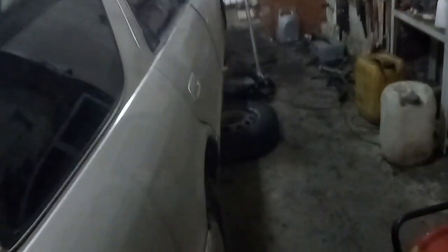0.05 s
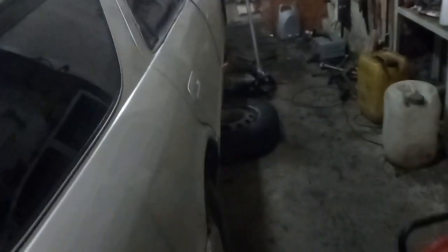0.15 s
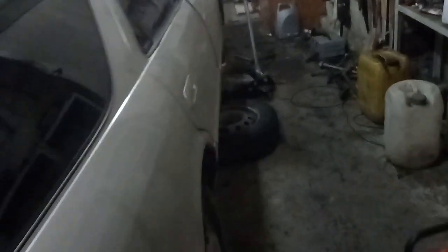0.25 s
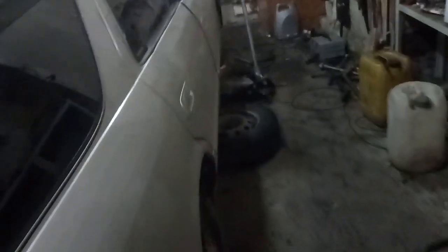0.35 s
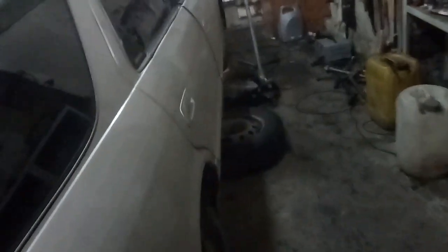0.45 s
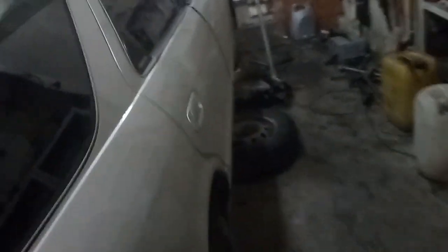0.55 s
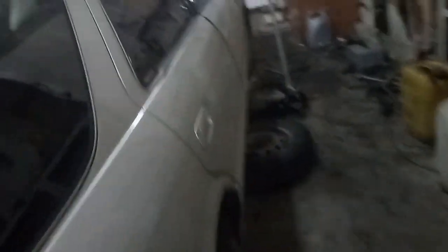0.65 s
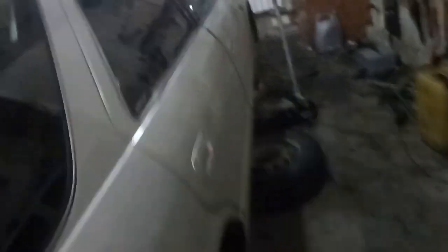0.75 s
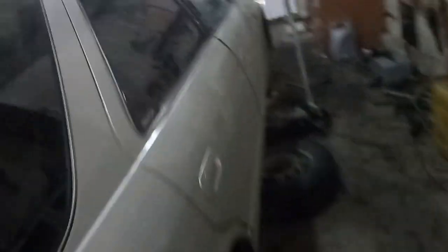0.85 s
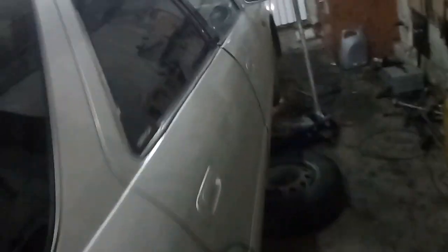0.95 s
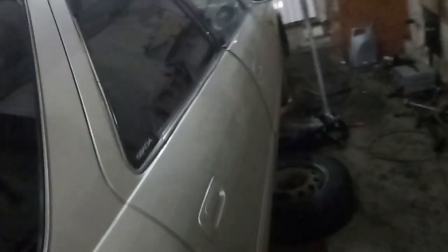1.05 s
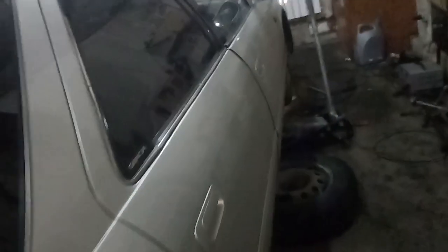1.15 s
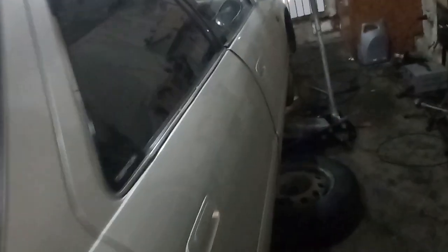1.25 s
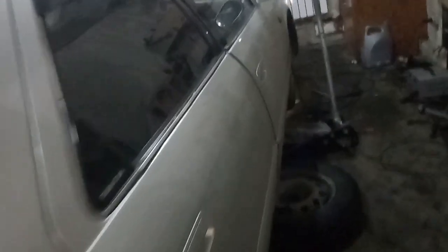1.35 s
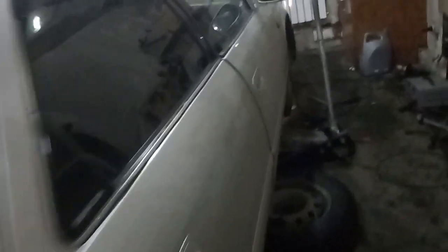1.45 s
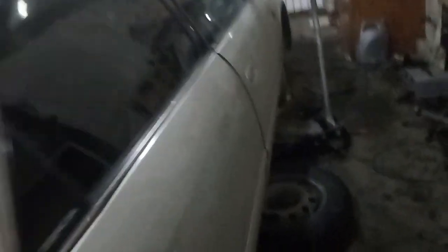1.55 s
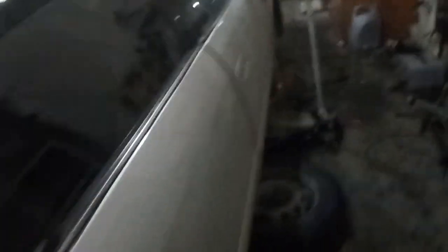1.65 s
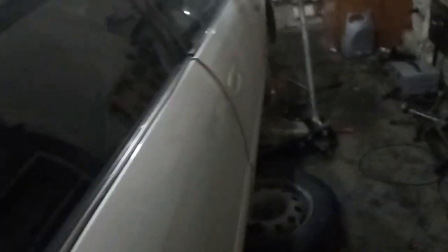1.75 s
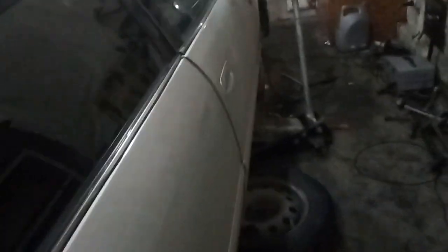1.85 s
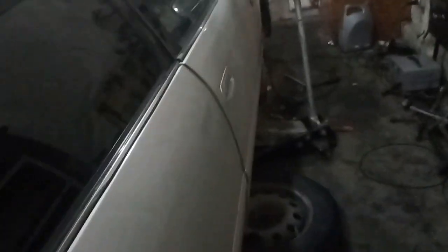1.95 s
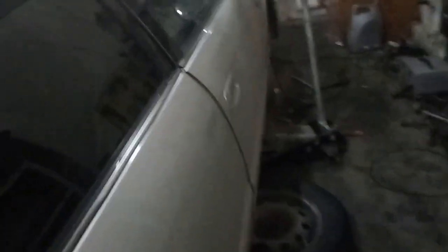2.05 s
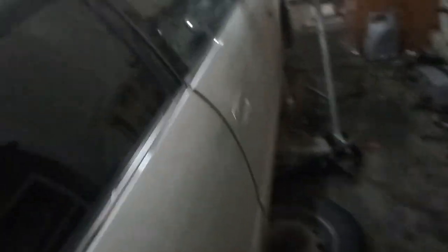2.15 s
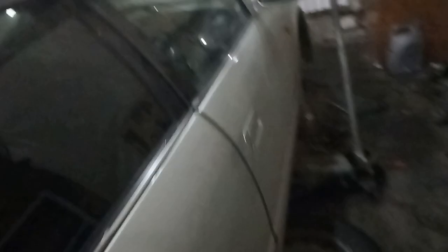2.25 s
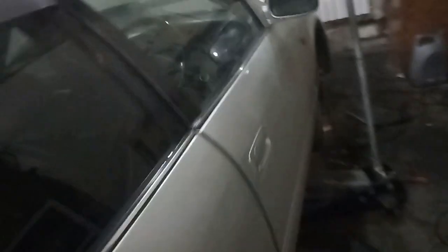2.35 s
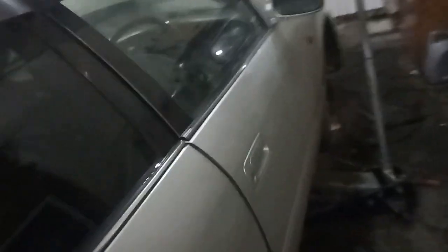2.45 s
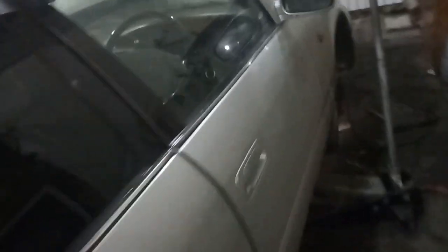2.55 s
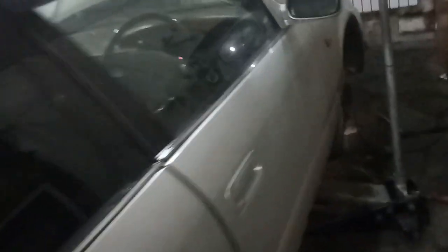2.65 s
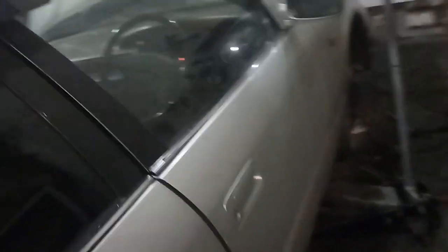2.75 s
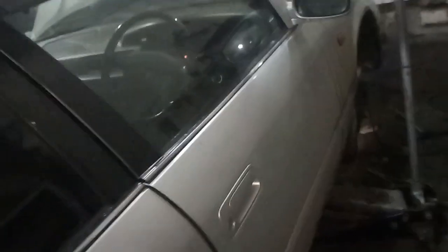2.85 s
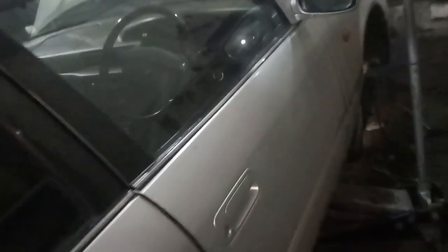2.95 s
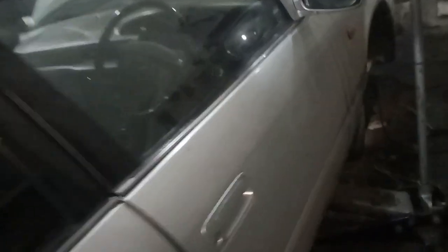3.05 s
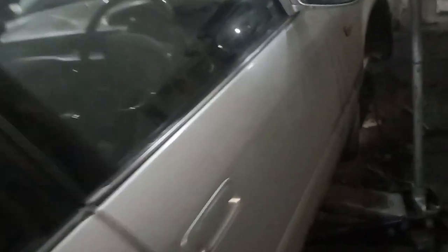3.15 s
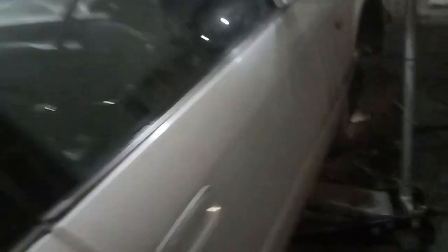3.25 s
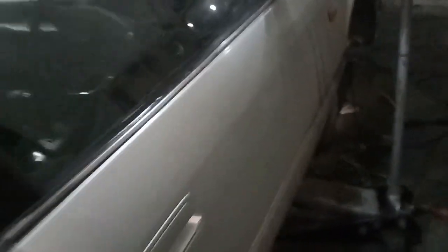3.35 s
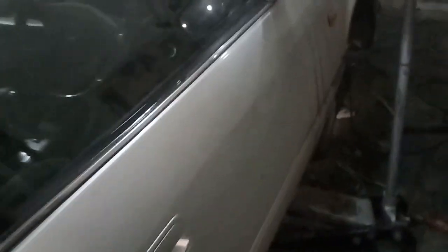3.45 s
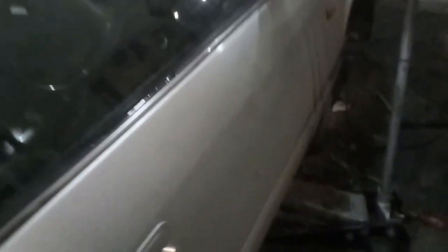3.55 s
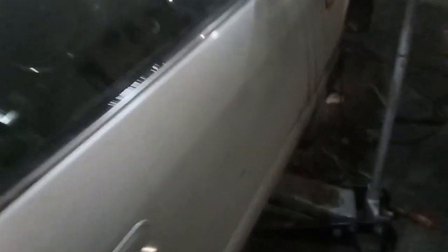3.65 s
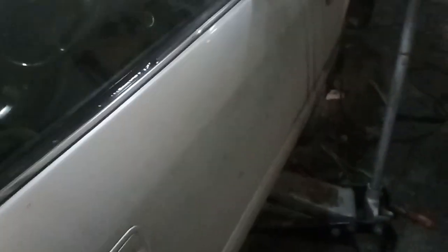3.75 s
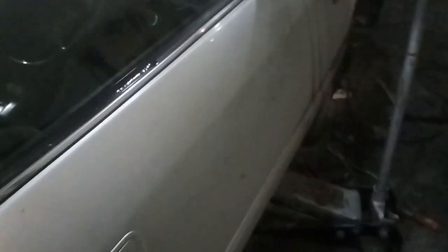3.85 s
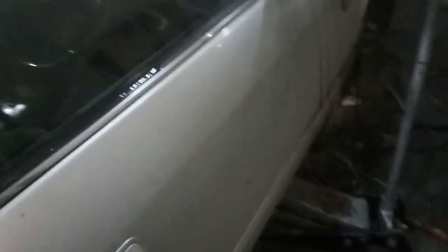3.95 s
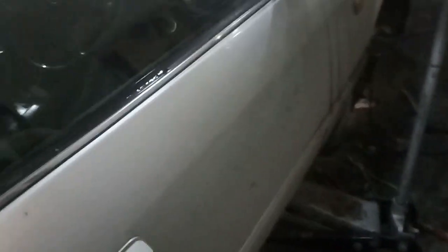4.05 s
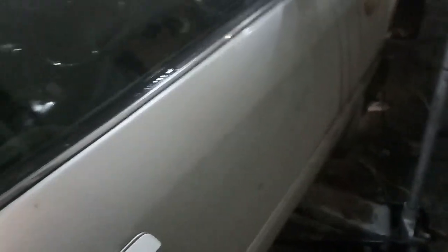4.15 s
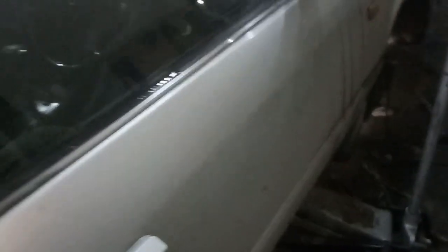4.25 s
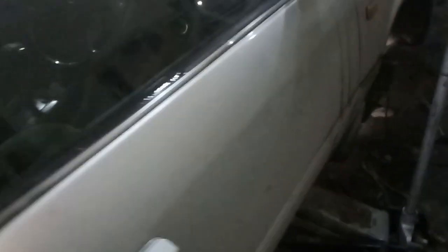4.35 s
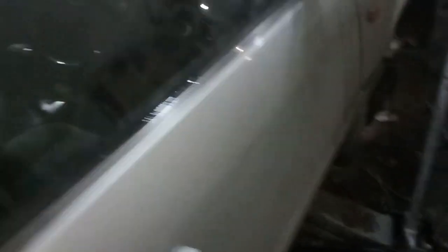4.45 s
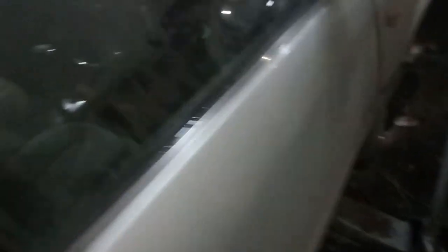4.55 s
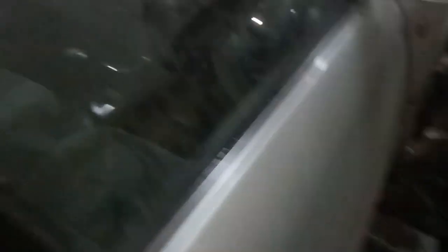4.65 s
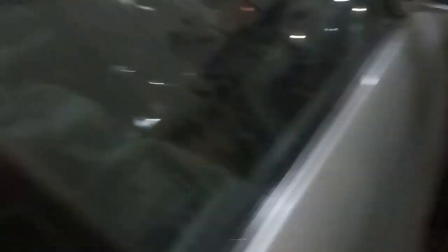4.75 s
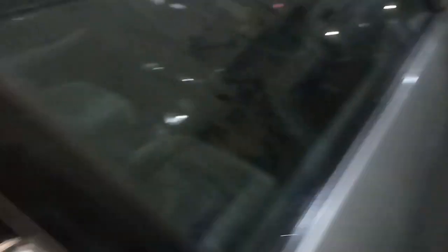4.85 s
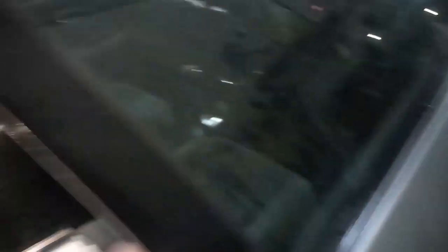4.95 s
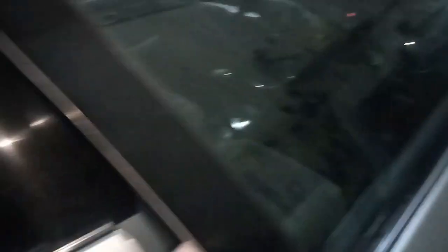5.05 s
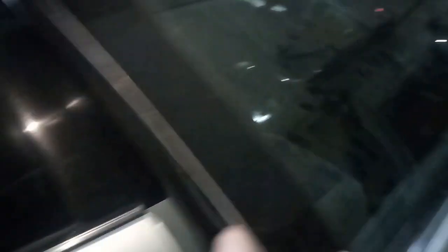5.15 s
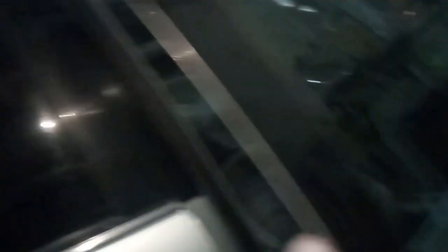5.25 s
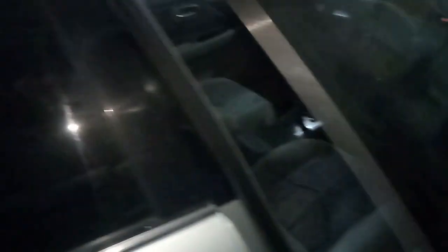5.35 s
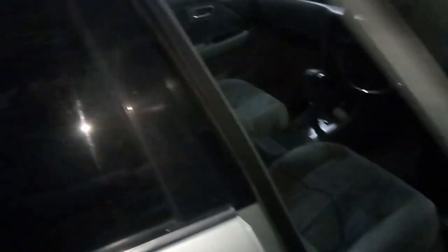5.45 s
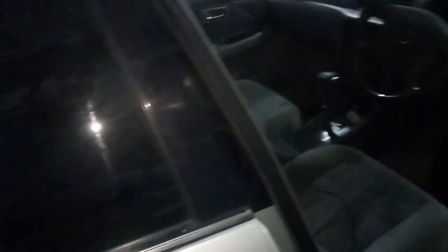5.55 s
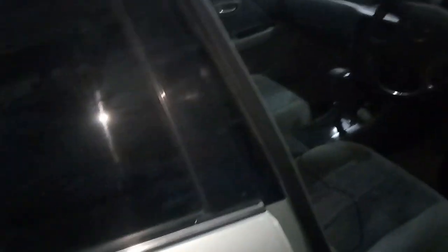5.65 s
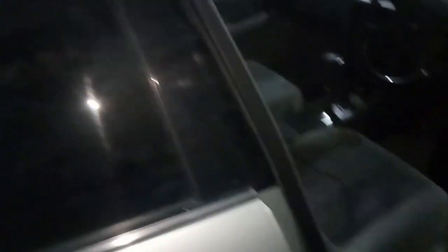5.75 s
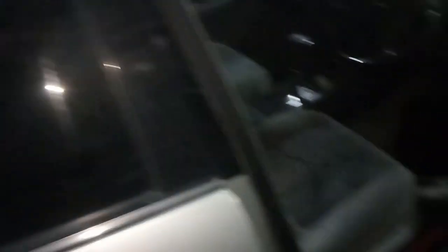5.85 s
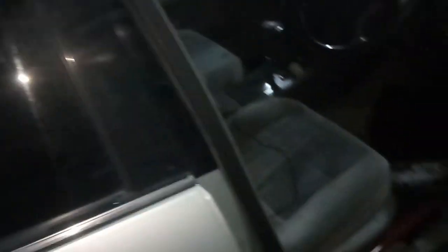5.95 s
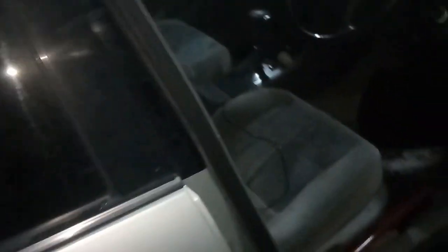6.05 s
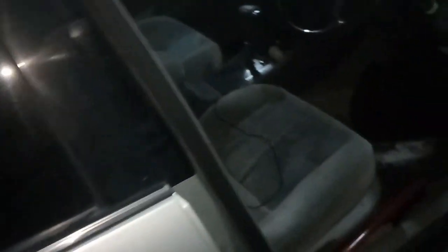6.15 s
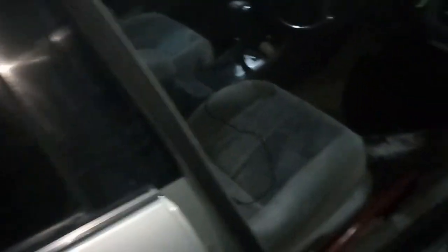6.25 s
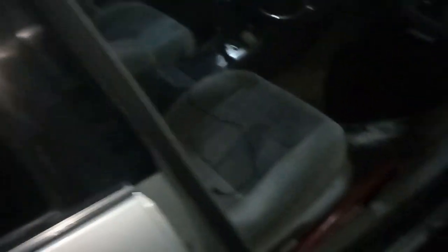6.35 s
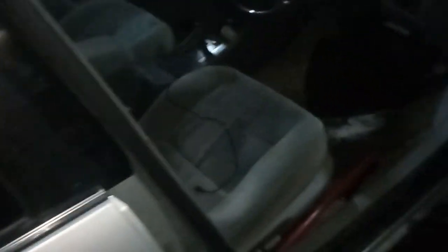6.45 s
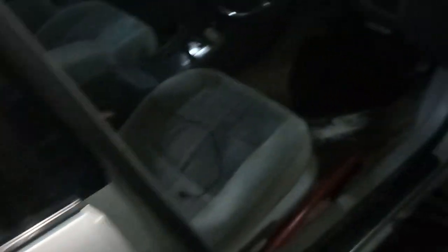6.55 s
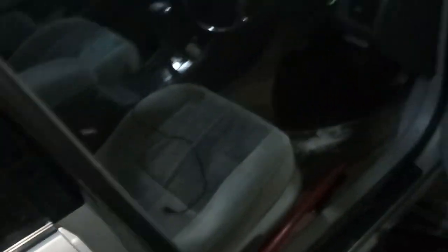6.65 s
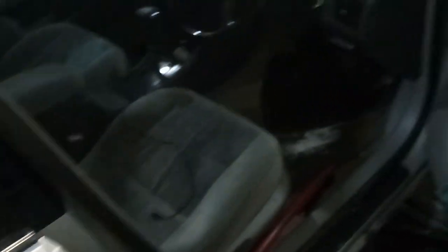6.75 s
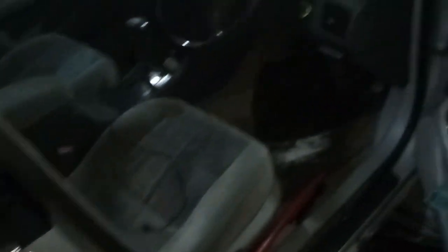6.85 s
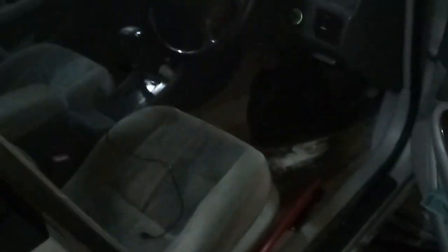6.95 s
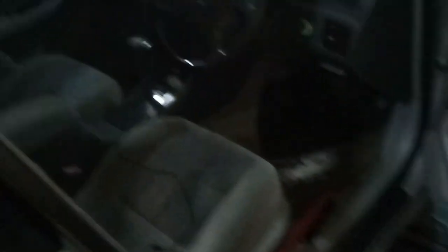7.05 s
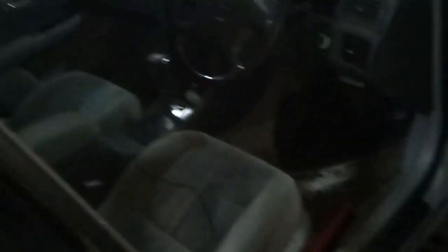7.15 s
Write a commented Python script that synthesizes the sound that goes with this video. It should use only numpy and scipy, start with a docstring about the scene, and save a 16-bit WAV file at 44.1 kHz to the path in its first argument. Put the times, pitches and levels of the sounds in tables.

```python
"""A jacket swishes as its wearer walks along a car in a small garage, holding two microphones close.
Soft footsteps pass, a hand knocks on the door handle, the latch lets go and the door pops off its seal;
then the handle ticks back and the sleeve sweeps past as the door swings open.
Cloth, air and handling are shaped noise; door and shoes are struck banks of decaying modes; cloth creases,
grit, zip and latch parts are short noise bursts; sparse random reflections give the garage."""
import sys
import numpy as np
from scipy import signal
from scipy.io import wavfile
from scipy.ndimage import uniform_filter1d

SR = 44100
rng = np.random.default_rng(int(sys.argv[2]) if len(sys.argv) > 2 else 0)


def to_wav(s):
    """Save 16-bit WAV."""
    ch = np.atleast_2d(s).T  # columns
    pcm = np.round(np.clip(ch, -1, 1) * 32767)  # PCM
    wavfile.write(sys.argv[1], SR, pcm.astype(np.int16))


N = 317961  # samples, 7.21 s

# Likeness of the noise at the two microphones. Each row: frequency in Hz, left-right correlation from 0 to 1.
LIKENESS = [(60, 0), (290, 0.81), (640, 0.59), (1400, 0.00013), (3000, 0), (15000, 0.26)]
# Spectrum of the still garage air. Each row: frequency in Hz, relative level in dB.
AIR_SPECTRUM = [(18, -37.5), (30, 11), (200, 2), (1830, -21), (2130, -5.5), (4200, -13), (6040, -2.5),
                (8040, -44.5), (11300, -30), (15000, -13.5)]
# Spectrum of handling rumble. Each row: frequency in Hz, relative level in dB.
RUMBLE_SPECTRUM = [(20, -16.5), (52, -22), (90, 2.5), (130, 6), (220, -4.5), (450, -18), (1500, -70.5)]
# Shifts of the hand's grip. Each row: start of the hold in seconds, hold in seconds, relative level in dB.
GRIP_SHIFTS = [(.68, 0.044, -62), (3.346, 0.24, -65), (4.165, .07, -48.5), (4.638, 0.18, -52),
               (5.11, 0.21, -61.5), (5.795, .06, -55), (6.297, .1, -61)]
GRIP_RISE_S, GRIP_FALL_S = 0.44, 0.25  # times for 20 dB
# Decay of the room's reflections. Each row: frequency in Hz, time to fall by 60 dB in seconds.
GARAGE_DECAY = [(100, 0.75), (300, 0.33), (1000, 0.63), (4000, 0.25), (12000, 0.52)]
# Cloth and fingers rubbing on the microphones' casing.
# Each row: start in seconds, length in seconds, centre frequency in Hz, rms level in dB.
CASING_RUBS = [(0.243, 0.24, 306, -63.5), (0.685, 0.064, 332, -54), (2.059, 0.079, 560, -64),
               (2.676, 0.11, 430, -58), (3.032, 0.094, 412, -61), (3.25, 0.14, 139, -61),
               (3.709, 0.14, 253, -54), (4.03, 0.18, 286, -50.5), (4.246, 0.075, 490, -50.5),
               (5.277, 0.033, 318, -57), (5.321, 0.099, 263, -62.5), (6.315, 0.067, 630, -48.5),
               (6.337, 0.13, 360, -52)]
# Resonances under a footfall or floor knock.
# Each row: frequency in Hz, relative level in dB, 60 dB decay time in seconds.
SHOE_MODES = [(84, -2.5, 0.32), (121, -3.5, 0.19), (144.7, 3, 0.18), (196, -1, 0.18), (253, 4, 0.04),
              (332.6, -6, 0.2), (381, 4.5, 0.063), (463, -7, 0.12), (705, -34, 0.061), (1010, -18, .05)]
# Heels and toes on the floor, and one faint knock at 2.06 s.
# Each row: start in seconds, relative level in dB, hardness as a cutoff in Hz.
FLOOR_BLOWS = [(.695, -53, 500), (1.526, -49.5, 320), (1.565, -48.5, 342), (1.594, -54.5, 150),
               (2.064, -61.5, 900), (2.387, -56, 504), (2.399, -41, 328), (2.416, -49, 547),
               (3.238, -52.5, 400), (3.26, -54.5, 600), (3.747, -53, 357), (3.786, -53.5, 200),
               (6.357, -51, 447)]
# Small clicks of cloth creases, grit, zip and latch parts.
# Each row: start in seconds, relative peak level in dB, centre in Hz,
# spread as a factor either side of it, 60 dB decay time in seconds, left minus right in dB.
CLICKS = [(.574, -48, 550, 2, .0075, 1), (.607, -47, 550, 2.4, 0.011, 13),
          (0.617, -46.5, 540, 1.47, 0.011, -14), (.684, -49, 650, 2.4, 0.0079, -16),
          (0.698, -39, 487, 1.64, 0.0093, -3), (.729, -40, 650, 2.7, 0.019, 7),
          (2.061, -49, 680, 1.28, 0.09, -1), (2.62, -32, 5800, 1.3, 0.037, 10),
          (3.149, -48, 2480, 1.3, .014, 25), (3.183, -43.5, 890, 1.3, 0.037, 4),
          (3.503, -39, 1470, 1.9, 0.0092, 16), (4.082, -37.5, 3240, 1.27, .025, -10),
          (4.121, -29, 3240, 1.78, 0.062, 0), (4.143, -36, 2500, 2.2, 0.043, -0.5),
          (4.167, -51, 9400, 1.24, 0.017, 6), (4.674, -30, 2100, 2.5, 0.085, 0.5),
          (4.714, -20.5, 1050, 2.2, .045, -6), (5.057, -38, 1400, 2.3, 0.007, 5),
          (5.139, -27, 3400, 1.6, 0.0046, -1), (5.166, -39, 895, 2.9, .014, -8),
          (5.289, -48, 1440, 1.4, .03, 10), (5.388, -45.5, 1300, 1.7, 0.035, 8),
          (5.724, -46, 1200, 2.7, 0.041, 9)]
# Door skin, frame and cabin. Each row: frequency in Hz, relative level in dB, 60 dB decay time in seconds.
DOOR_MODES = [(122, -22.5, 0.66), (149.7, -4, 0.22), (239, 4.5, 0.12), (270, 1, 0.028), (328, -22.5, 0.36),
              (385, -1, 0.15), (446, -12.5, 0.19), (528, 9.5, 0.043), (556, 9.5, 0.055), (610, -8, 0.17),
              (713, -6.5, 0.16), (748, -11.5, 0.16), (840, -3.5, 0.1), (922, -12, 0.16),
              (997, -10.5, 0.082), (1137, -6, 0.088), (1250, -46.5, 0.081), (1334, -25, 0.2),
              (1600, -13.5, 0.12), (2310, -22, 0.065), (2530, -7.5, 0.032), (2900, -18.1, 0.027)]
# Blows of hand, handle, latch and seal. Each row: start in seconds, relative level in dB, hardness cutoff in Hz.
DOOR_BLOWS = [(4.058, -49, 1200), (4.0822, -37.5, 470), (4.0946, -40, 431), (4.1233, -41.5, 3543),
              (4.138, -36, 330), (4.2555, -46.5, 494), (4.275, -47.5, 1998), (4.3013, -46.5, 484),
              (4.3337, -59, 433), (4.6753, -39, 686), (4.7144, -18.5, 3015), (4.717, -19.5, 617),
              (4.7232, -20.5, 540), (4.7395, -31, 2391), (4.7489, -41, 471), (4.7836, -38.5, 804),
              (4.8392, -42.5, 152), (5.073, -54, 219), (5.091, -49, 165), (5.287, -55, 432)]
# Groans of the door skin as handle and seal drag on it.
# Each row: start in seconds, length in seconds, fundamental in Hz, relative level in dB.
DOOR_GROANS = [(4.145, 0.083, 123.8, -37), (4.335, .07, 121.5, -48.5), (4.668, 0.052, 240, -29.5)]
# Strokes of the sleeve over the jacket; rise and fall are the times for 20 dB.
# Each row: full speed reached in seconds, rise, hold and fall in seconds, relative level in dB, then in dB on
# top of it the crumpling body, treble sheen and crease pops, and last left minus right in dB.
SLEEVE_STROKES = [(0, .1, 0.033, .25, -66, -2, -4.5, -4, 7.5), (0.265, 0.26, 0.037, .3, -52.5, -2, 4, 3, 4),
                  (.45, 0.37, 0.2, 0.25, -57, -2, 0.5, 0, 6.5),
                  (0.737, .28, 0.033, .075, -47.5, -2, -0.5, 5, 2),
                  (0.988, 0.22, 0.019, 0.32, -45.5, -9, -4, -11, 2.5),
                  (1.146, 0.13, 0.028, .27, -54, 3, 1, 1, 3),
                  (1.598, 0.086, 0.031, 0.33, -53.5, 3, 0.5, -11, 3),
                  (1.831, 0.18, 0.017, .3, -55.5, 1.5, -8.5, -16, 3.5),
                  (2.0, 0.23, 0.087, .17, -61.5, 1.5, -9.5, 2, 0),
                  (2.445, 0.1, 0.014, 0.13, -56, 0, -7, -9, 3.5),
                  (2.632, 0.045, .06, 0.26, -49, -1.5, -1, -6, -2.5),
                  (2.742, 0.21, 0.084, 0.27, -44, -5, -4.5, -7, -1.5),
                  (3.027, 0.24, .1, .2, -52.5, 0, -2, -15, -1),
                  (3.36, 0.37, 0.13, 0.31, -53, 2.5, -5, -2, 2),
                  (3.616, 0.31, 0.067, 0.45, -45, -1, 2, -4, -3),
                  (3.925, 0.25, 0.059, 0.14, -46.5, -2, 0.5, -7, -3),
                  (4.06, .1, 0.084, 0.083, -53.5, 12, -6.5, 1, -2),
                  (4.266, 0.1, 0.025, .15, -57.5, 10.5, -1.5, 13.5, -1),
                  (4.607, 0.32, 0.13, 0.2, -52, 4.5, -1.5, 1, -3.5),
                  (4.738, 0.097, 0.17, .13, -38.5, -4.5, 4.5, 2, -2.5),
                  (5.22, 0.16, 0.049, 0.28, -53, -6.5, -2.5, -5, 3),
                  (5.03, .1, 0.069, .17, -54.5, 3, -6, 2, -2),
                  (5.42, 0.16, 0.3, .15, -55, -14.5, -7, -12, -1),
                  (5.732, 0.16, 0.24, 0.3, -53.5, 9.5, -9, -7, -2),
                  (5.986, 0.43, 0.08, .3, -41, -4.5, 4.5, -3.5, -1.5),
                  (6.154, 0.22, 0.11, .33, -39.5, -5, 5, -4, 1),
                  (6.443, 0.6, 0.03, .2, -44, 2.5, 4.5, 4, 2.5),
                  (6.592, 0.133, 0.016, .075, -47.5, -4, 0.5, -3, 1),
                  (6.875, 0.18, 0.063, .3, -53.5, -12, 4.5, -15, 5),
                  (7.047, 0.23, 0.087, .25, -50.5, 0.5, 5.5, 2.5, 2)]
# Jacket cloth at the microphones. Each row: frequency in Hz, left and right relative level in dB.
CLOTH_SPECTRUM = [(96, -20, -11), (343, 3.5, 3), (810, 0, 3), (1350, 5, 0), (1780, 5, -1.5), (2940, 1.5, 0),
                  (3970, -1, -0.5), (5600, 4.5, 4), (6530, 5, 3), (8070, -8.5, -14), (10070, -7.5, -22),
                  (13500, -9.5, -25), (14600, 1.5, -22), (15870, 1.87, -3.5)]
# Slow colour of the hiss. Each row: time in seconds, presence near 3.4 kHz in dB, fizz near 15 kHz in dB.
COLOUR_CURVE = [(0, 3, -10), (.5, -5.5, -8), (1.1, -1, -1.5), (1.6, 2, -2), (2.3, -0.5, -0.5),
                (2.8, -1, -3.5), (3.3, 1, -1), (4.1, 3.5, -2.5), (4.8, 1, -2.5), (5.5, 3, -4),
                (6.3, -0.5, -0.5), (7.2, 1, 3.5)]
STIR_DB, STIR_BODY_DB = -70.5, 2.5  # the jacket never quite rests: relative level, crumpling body
EDGE_HZ = 15650  # upper band limit


def amp(db):
    """Level definition: 20 dB is a factor of ten in amplitude."""
    return 10 ** (np.asarray(db) / 20)


def evened(x):
    """Power normalisation: scales to rms 1."""
    return x / np.sqrt(np.mean(x ** 2) + 1e-20)


def read(points, hz, axis=1):
    """Log-frequency interpolation of one column of a spectrum table."""
    table = np.transpose(points)
    return np.interp(np.log(hz + 1), np.log(table[0] + 1), table[axis])


def follow(rows, t):
    """Linear interpolation of the columns of a curve table at the times t."""
    s, *columns = np.transpose(rows)
    return [np.interp(t, s, column) for column in columns]


def add(mix, s, sound):
    """Superposition: sounds sum, here from time s on."""
    part = mix[..., round(s * SR):][..., :sound.shape[-1]]
    part += sound[..., :part.shape[-1]]


def sides(pan_db):
    """Interaural level difference: left and right gains that lie pan_db apart, positive to the left."""
    pan_db = np.atleast_1d(pan_db)
    return amp(np.array([pan_db, -pan_db]) / 2)


def band(x, low_hz, high_hz, order=2):
    """Band-pass filtering: only the range between two cutoffs passes freely."""
    sos = signal.butter(order, [low_hz, min(high_hz, .45 * SR)], "band", fs=SR, output="sos")
    return signal.sosfilt(sos, x)


def noise_frames(size=512):
    """Partial coherence: random spectra at two microphones; times, frequencies, (2, frames, bins)."""
    hop = size // 4
    t = np.arange(N // hop + 2) * hop / SR
    hz = np.fft.rfftfreq(size, 1 / SR)
    real, imaginary = rng.standard_normal((2, 2, len(t), len(hz)))
    left, own = real + 1j * imaginary
    same = read(LIKENESS, hz)
    right = same * left + np.sqrt(1 - same ** 2) * own
    return t[:, None], hz, np.array([left, right])


def to_sound(z):
    """Overlap-add synthesis: short-time spectra become samples."""
    return signal.istft(z, nperseg=512, noverlap=384, time_axis=1, freq_axis=2)[1][:, :N]


def swell(t, s, rise, hold, fall, bend=1.33):
    """Movement envelope: speed gathers until s, holds, then drops ever faster to a stop."""
    early = np.maximum(s - t, 0) / rise
    late = np.maximum(t - s - hold, 0) / fall
    return amp(-20 * np.minimum(early + late ** bend, 10))


def strike(modes, hard_hz, rattle, rattle_t60, lowest_hz):
    """Modal impact: modes ring over a brief rattle, a soft contact excites little treble; 25 ms rms is 1."""
    t = np.arange(SR // 2) / SR
    ring = np.zeros(len(t))
    for k, (hz, db, t60) in enumerate(modes):
        direction = (-1) ** k  # neighbouring modes move in opposite directions
        build_up = 1 - np.exp(-2 * hz * t)  # each needs part of a cycle
        ring += direction * amp(db - 60 * t / t60) * np.sin(2 * np.pi * hz * t) * build_up
    loose = evened(band(rng.standard_normal(len(t)), 190, 1400)) * np.exp(-np.log(1000) * t / rattle_t60)
    x = signal.sosfilt(signal.butter(3, hard_hz, fs=SR, output="sos"), ring + rattle * loose)
    x = signal.sosfilt(signal.butter(3, lowest_hz, "high", fs=SR, output="sos"), x)
    return x / np.sqrt(np.mean(x[:SR // 40] ** 2))


def garage(x, size=26000):
    """Statistical reverberation: reflections of random sign, each band decaying at its own speed."""
    taps = rng.standard_normal((2, size)) * (rng.random((2, size)) < .1)
    taps[:, :round(.006 * SR)] = 0  # no reflection in the first 6 ms
    hz, t, z = signal.stft(taps, SR, nperseg=256)
    same = 1 / (1 + (hz[:, None] / 1100) ** 2)  # long waves reach both microphones alike
    z[1] = same * z[0] + np.sqrt(1 - same ** 2) * z[1]
    decay = np.exp(-np.log(1000) * t / read(GARAGE_DECAY, hz)[:, None])
    tail = signal.istft(z * decay, SR)[1]
    return signal.fftconvolve(x, tail / np.linalg.norm(tail[0]), axes=1)[:, :N]


def background(air_db=-67, handling_db=-1, arm_db=-25):
    """Ambient and structure-borne noise: still air, and rumble from arm strokes and shifts of the grip."""
    t, hz, z = noise_frames()
    air = evened(to_sound(z * amp(read(AIR_SPECTRUM, hz))))
    t, hz, z = noise_frames()
    shared = z + .5 * z[::-1]  # each side takes in half of the other
    rumble = evened(to_sound(shared * amp(read(RUMBLE_SPECTRUM, hz))))
    t = t[:, 0]
    power = np.zeros(len(t))
    for s, hold, db in GRIP_SHIFTS:
        power += (amp(db) * swell(t, s, GRIP_RISE_S, hold, GRIP_FALL_S)) ** 2
    for *shape, db, body_db, _, _, _ in SLEEVE_STROKES:
        power += (amp(arm_db + db + body_db) * swell(t, *shape)) ** 2
    grip = np.interp(np.arange(N) / SR, t, np.sqrt(power))
    return amp(air_db) * air + amp(handling_db) * grip * rumble * sides(-7.5)


def rubs(width=1.23, apart=0.46):
    """Friction noise: short hollow scuffs carried by the casing, partly shared by both microphones."""
    out = np.zeros((2, N))
    for s, length, hz, db in CASING_RUBS:
        shared, *own = rng.standard_normal((3, round(length * SR)))
        scuff = band(shared + apart * np.array(own), hz / width, hz * width)
        add(out, s, amp(db) * evened(scuff * signal.windows.tukey(len(shared), .7)))
    return out


def footsteps_and_knock(room_db=-8, pan_db=-3):
    """Soft impact: soft soles, and one faint knock, excite low modes, a little stronger at the right."""
    x = np.zeros(N)
    for s, db, hard_hz in FLOOR_BLOWS:
        add(x, s, amp(db) * strike(SHOE_MODES, hard_hz, rattle=0.8, rattle_t60=0.073, lowest_hz=118))
    pair = x * sides(pan_db)
    return pair + amp(room_db) * garage(pair)


def ticks(room_db=-10):
    """Transient excitation: a sharp noise burst decays at once; low ones reach both sides more alike."""
    out = np.zeros((2, N))
    t = np.arange(SR // 10) / SR
    for s, db, hz, spread, t60, pan_db in CLICKS:
        burst = rng.standard_normal((2, len(t))) * np.exp(-np.log(1000) * t / t60)
        shared = burst + burst[::-1] / (1 + hz / 1000)
        click = band(shared, hz / spread, hz * spread, order=3)
        add(out, s, amp(db) * click / abs(click).max() * sides(pan_db))
    return out + amp(room_db) * garage(out)


def door(room_db=-16, pan_db=-0.2, lag_s=0.0002, overtone=0.27, shade=0.32):
    """Shared resonance: handle, latch and seal shake one door, a little nearer the right microphone."""
    x = np.zeros(N)
    for s, db, hard_hz in DOOR_BLOWS:
        add(x, s, amp(db) * strike(DOOR_MODES, hard_hz, rattle=0.58, rattle_t60=0.085, lowest_hz=98))
    for s, length, hz, db in DOOR_GROANS:
        turn = 2 * np.pi * hz * np.arange(round(length * SR)) / SR
        groan = np.sin(turn) + overtone * np.sin(2 * turn)
        add(x, s, amp(db) * groan * signal.windows.tukey(len(turn), .6))
    shaded = x - shade * band(x, 490, 680, order=1)  # the left side is shaded from the latch's ring
    pair = np.array([np.roll(shaded, round(lag_s * SR)), x]) * sides(pan_db)
    return pair + amp(room_db) * garage(pair)


def creases(level_db=-16, per_s=48, spread_db=2.0):
    """Snap-through buckling: folds in the cloth flip at random with small dull pops during each stroke."""
    t = np.arange(0, N, 100) / SR
    power = np.zeros(len(t))
    for *shape, db, _, _, pops_db, _ in SLEEVE_STROKES:
        power += (amp(db + pops_db) * swell(t, *shape)) ** 2
    crush = np.interp(np.arange(N) / SR, t, np.sqrt(power))
    strength = amp(spread_db * np.minimum(rng.exponential(1, N), 3))
    snaps = (rng.random(N) < per_s / SR) * rng.choice([-1, 1], N) * strength
    pops = band(snaps * sides(rng.normal(1, 2.3, N)), 210, 1150)
    return amp(level_db) * crush * evened(pops)


def jacket(level_db=-42.5, patchy_db=1.54, uneven_db=0.8):
    """Friction noise: woven cloth hisses with the speed of each stroke, with its own body and sheen."""
    t, hz, z = noise_frames()
    low = 1 / (1 + (hz / 1500) ** 2)
    high = 1 / (1 + (7500 / (hz + 1)) ** 6)
    speeds = np.hstack([swell(t, *row[:4]) for row in SLEEVE_STROKES])
    spectra = np.stack([amp(db + low * body_db + high * sheen_db) * sides(pan_db)
                        for *_, db, body_db, sheen_db, _, pan_db in SLEEVE_STROKES], axis=1)
    stir = amp(STIR_DB + low * STIR_BODY_DB - 3.8 * high) * sides(1.0)
    hiss = np.sqrt(speeds ** 2 @ spectra ** 2 + stir[:, None] ** 2)  # strokes add in power
    # random level drift: patches in time and frequency, and a slower one common to all bands
    patches = uniform_filter1d(rng.standard_normal(z.shape[1:]), size=12, axis=0)
    patches = evened(uniform_filter1d(patches, size=4, axis=1))
    uneven = evened(uniform_filter1d(rng.standard_normal(t.shape), size=18, axis=0))
    field_db = patchy_db * patches + uneven_db * uneven
    # presence raises or lowers the hiss near 3.4 kHz and, slightly, the band near 5.8 kHz the other way
    presence_db, fizz_db = follow(COLOUR_CURVE, t)
    presence_band = np.exp(-((hz - 3400) / 1200) ** 2) - 0.13 * np.exp(-((hz - 5800) / 1100) ** 2)
    fizz_band = np.exp(-((hz - 15000) / 3000) ** 2)
    field_db = field_db + presence_db * presence_band + fizz_db * fizz_band
    colour_db = np.array([read(CLOTH_SPECTRUM, hz, axis=1), read(CLOTH_SPECTRUM, hz, axis=2)])[:, None]
    return amp(level_db) * evened(to_sound(z * hiss * amp(field_db + colour_db)))


def scene():
    """Superposition of all sources at the two microphones."""
    return background() + rubs() + footsteps_and_knock() + ticks() + door() + creases() + jacket()


def record(dry):
    """Band limitation: a linear-phase low-pass removes what lies above EDGE_HZ."""
    low_pass = signal.firwin(511, EDGE_HZ, window=("kaiser", 9), fs=SR)
    return signal.oaconvolve(dry, low_pass[None], "same")


dry = scene()
out = record(dry)
to_wav(out)
```